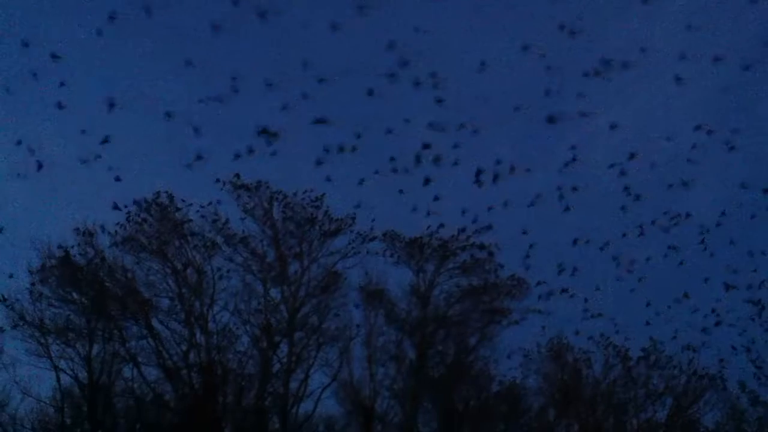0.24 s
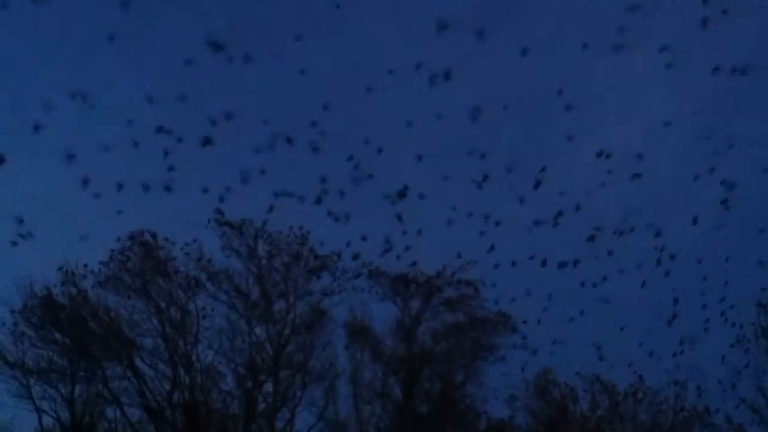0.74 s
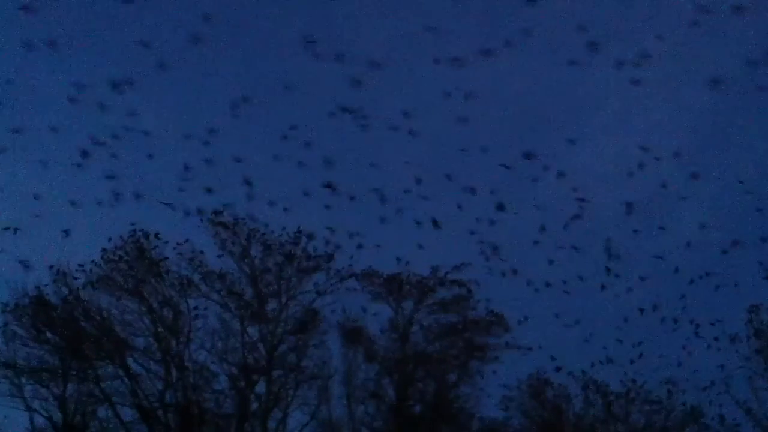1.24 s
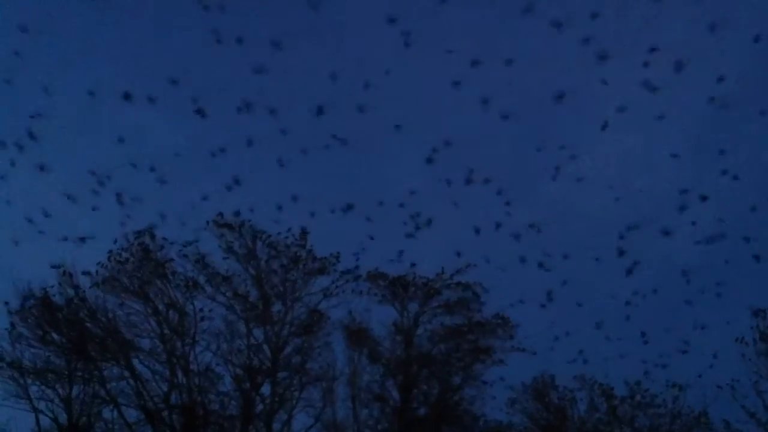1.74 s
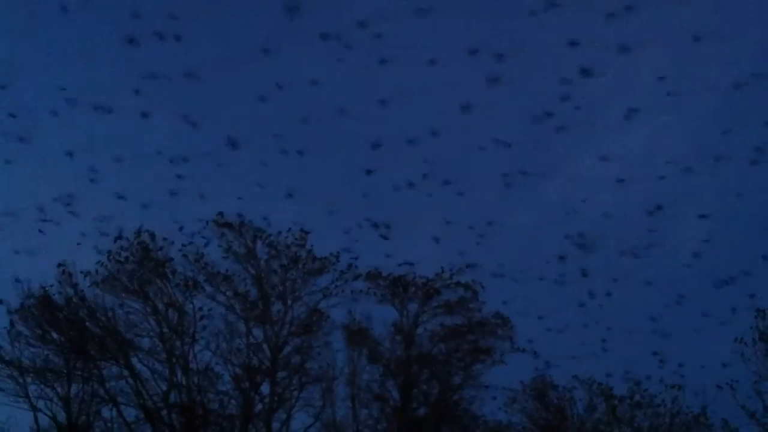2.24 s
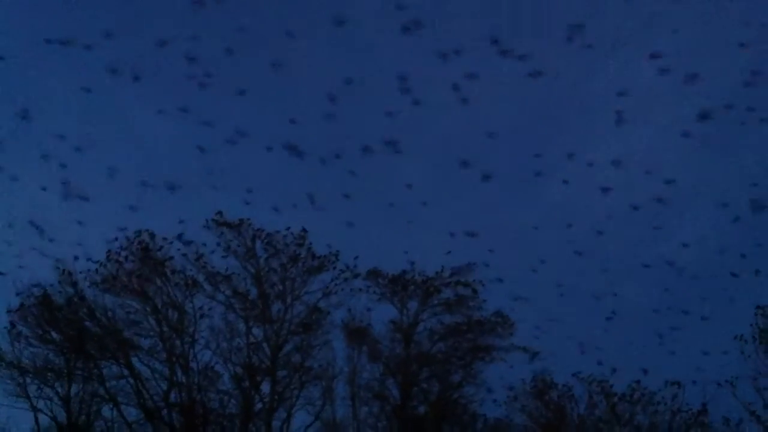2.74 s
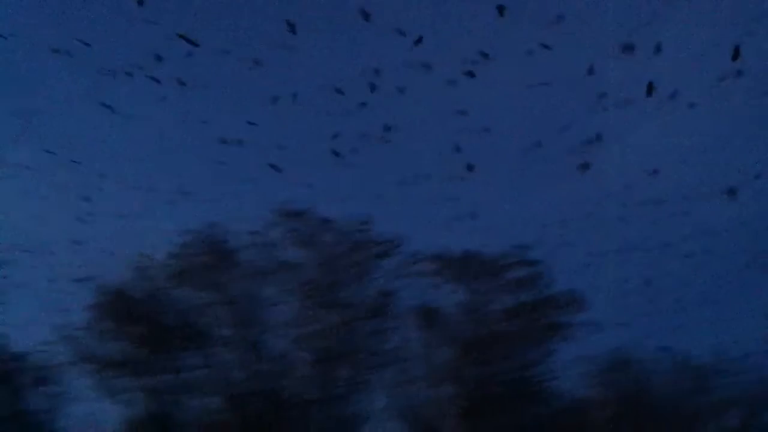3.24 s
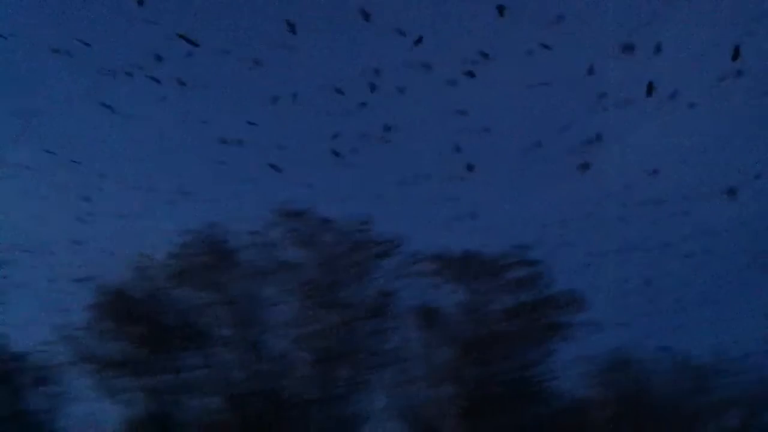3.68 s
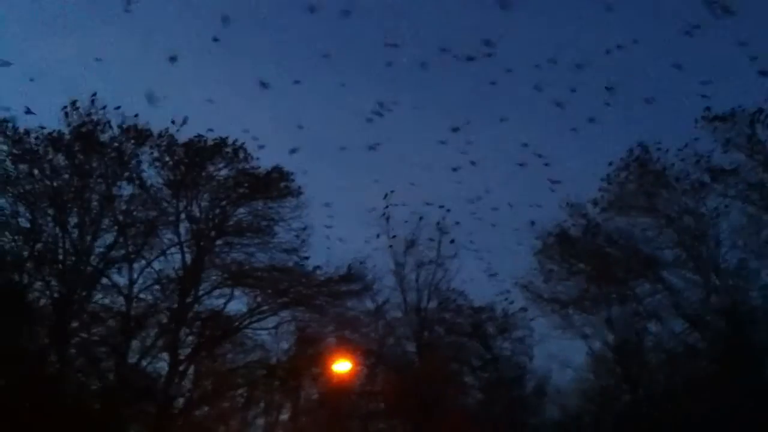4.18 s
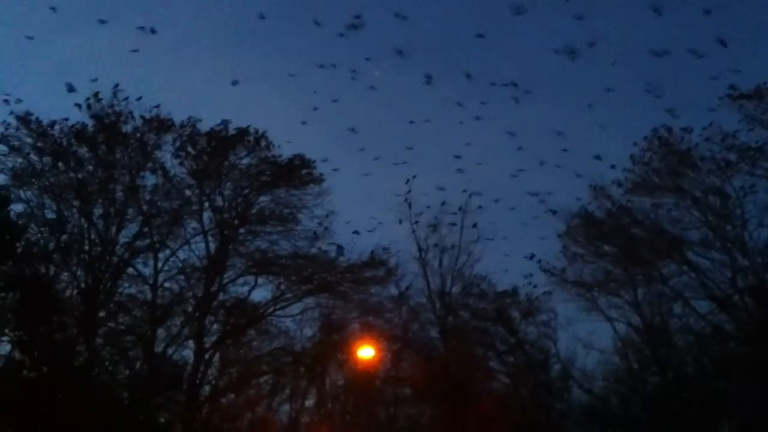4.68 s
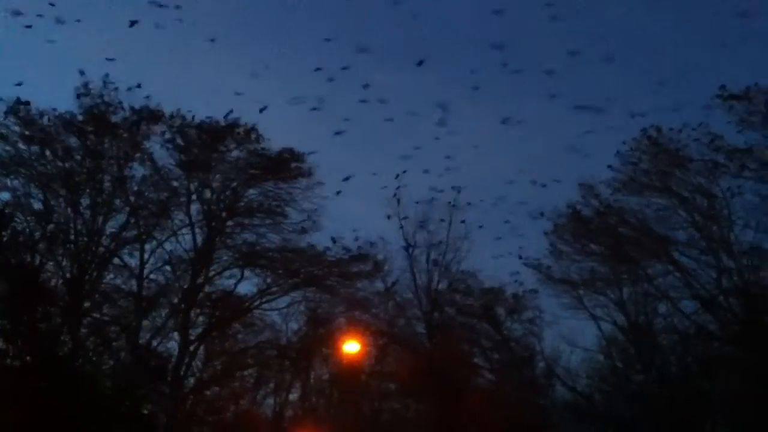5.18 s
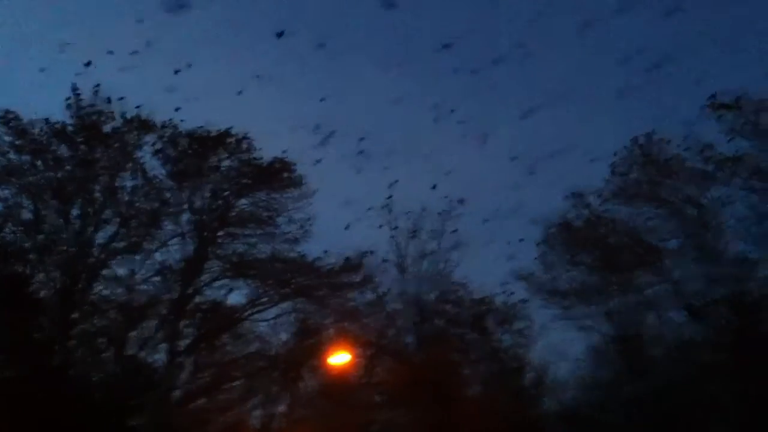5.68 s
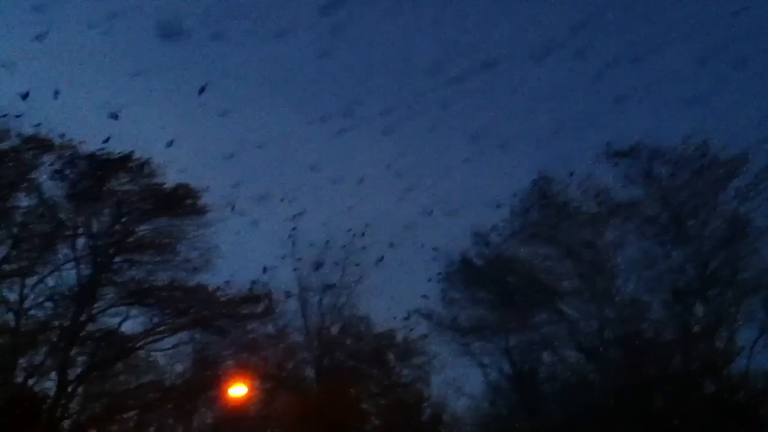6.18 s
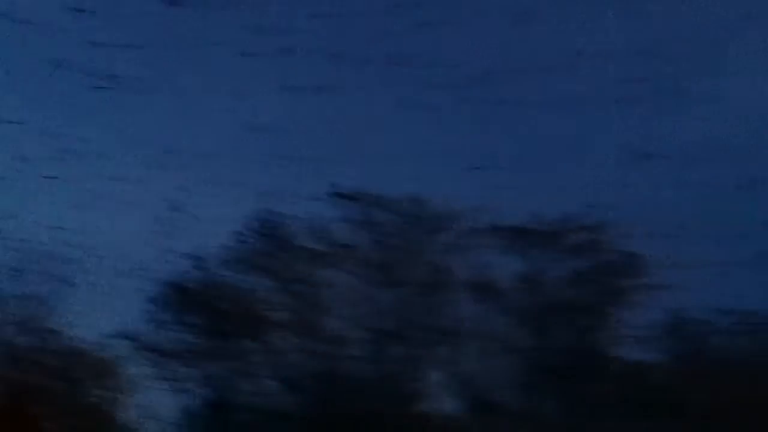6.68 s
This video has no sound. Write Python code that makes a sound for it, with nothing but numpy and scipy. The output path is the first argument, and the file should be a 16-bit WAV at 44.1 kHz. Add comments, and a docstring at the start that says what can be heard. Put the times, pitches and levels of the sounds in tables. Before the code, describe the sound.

Hundreds of crows circle above trees at dusk, their short hoarse caws overlapping into a dense, continuous clamour already under way at the start. A few closer caws and brief raspy yelps stand out, more often around the middle. The din swells and brightens unevenly as birds turn, with calls blurred by the branches. Far traffic murmurs very faintly beneath. Open outdoor microphone, the flock spread overhead, no ending.

```python
"""A roost in trees at dusk: a huge flock of crows wheels over it, hundreds of hoarse caws merging into one din.
The caws are pulses and puffs of air through a throat colour; the din swells and brightens as birds pass closer.
Nearer caws with a moving throat resonance and high raspy yelps stand out of it.
The trees scatter every call into diffuse tails; far from the microphone, filtered noise makes a traffic murmur,
with faint low hums and one soft swell of airy hiss."""
import sys
import numpy as np
from scipy import signal
from scipy.fft import rfft, irfft, next_fast_len
from scipy.io import wavfile
from scipy.ndimage import uniform_filter1d

SR = 44100
rng = np.random.default_rng(int(sys.argv[2]) if len(sys.argv) > 2 else 0)


def master(y):
    """Save y as 16-bit WAV."""
    cut = np.clip(np.atleast_2d(y).T, -1, 1)
    pcm = np.round(cut * 32767)  # scale
    wavfile.write(sys.argv[1], SR, pcm.astype(np.int16))


N = 305767  # length of the scene [samples]

# mean colour of a caw: (frequency [Hz], relative level [dB per Hz])
THROAT_COLOUR = [(60, -63), (380, -30.5), (700, -15), (850, -12.5), (1020, -8.5), (1300, 1.34), (1600, -1),
                 (1900, -5), (2300, -18), (2600, -21), (3100, -18.5), (3450, -20), (3850, -27),
                 (5000, -26.5), (6300, -27.5), (8000, -39), (11000, -53)]


def amp(db):
    """Decibels to gain."""
    return 10 ** (np.asarray(db) / 20)


def evened(x):
    """Scales to rms 1."""
    return x / np.sqrt(np.mean(x ** 2) + 1e-20)


def read(points, hz):
    """Reads a table on a log-frequency axis."""
    f, value = np.transpose(points)
    return np.interp(np.log(hz + 1), np.log(f + 1), value)


def add(mix, s, sound):
    """Adds a sound at time s, cut to the length of the mix."""
    start = int(round(s * SR))
    sound = sound[max(-start, 0):]
    part = mix[max(start, 0):][:len(sound)]
    part += sound[:len(part)]


def coloured(x, db_at):
    """Filters x by a gain in dB given as a function of frequency."""
    size = next_fast_len(len(x))
    gain = amp(db_at(np.fft.rfftfreq(size, 1 / SR)))
    return irfft(rfft(x, size) * gain, size)[:len(x)]


def wavering(count, size, smooth):
    """Noise averaged over `smooth` samples and set to rms 1, of which the first `count` are kept."""
    return evened(uniform_filter1d(rng.standard_normal(size), size=smooth))[:count]


def distant_traffic(level_db=-48.5, top_hz=800):
    """Coloured noise for far traffic and the faint hiss of the air; only the low part slowly swells."""
    # colour of the murmur and air: (frequency [Hz], relative level [dB per Hz])
    floor_colour = [(25, -30), (45, -25), (70, -15), (100, -7.7), (130, -1.5), (210, 1), (250, 0.5),
                    (335, 6.5), (450, 2), (650, 5), (2000, -13), (9000, -32.5), (15500, -33)]
    # swell of the traffic: (time [s], level above the usual [dB])
    traffic_level = [(0, -2), (1.4, -1.1), (2.7, 0.3), (3.8, 0), (4.6, 0.6), (6.0, 0), (6.93, -0.2)]
    murmur = amp(level_db) * evened(coloured(rng.standard_normal(N), lambda f: read(floor_colour, f)))
    low_part = coloured(murmur, lambda f: read([(top_hz / 2, 0), (top_hz * 2, -30)], f))
    swell = amp(np.interp(np.arange(N) / SR, *np.transpose(traffic_level)))
    return murmur + low_part * (swell - 1)


def low_hums():
    """Faint sine tones of wavering pitch that come and go."""
    # (time [s], length [s], level [dB], pitch [Hz], unsteadiness of pitch [share])
    hum_events = [(2.9, 0.62, -61.5, 200.8, 0.05), (4.539, 0.52, -60, 221.6, 0.0036),
                  (6.78, 0.35, -58.5, 207, 0.016)]
    out = np.zeros(N)
    for s, length, db, hz, unsteady in hum_events:
        u = np.linspace(0, 1, int(length * SR))
        waver = wavering(len(u), N, smooth=2000)
        turns = np.cumsum(hz * (1 + unsteady * waver)) / SR
        add(out, s, amp(db) * evened(np.sin(2 * np.pi * turns) * np.sin(np.pi * u)))
    return out


def airy_hiss(peak_s=.93, width_s=.27, level_db=-66.5, air_hz=9000, flicker_db=2.0):
    """High noise that swells once, unevenly, and dies away."""
    hiss = evened(coloured(rng.standard_normal(N), lambda f: read([(air_hz / 2, -20), (air_hz, 0)], f)))
    swell = 1 / (1 + ((np.arange(N) / SR - peak_s) / width_s) ** 2)
    flicker = amp(flicker_db * wavering(N, N, smooth=2500))
    return amp(level_db) * swell * flicker * hiss


def trees(x, wet_db, count=22, hop=.1):
    """Branches scatter each call into a diffuse tail whose treble dies first; the paths change as the birds fly."""
    # ring of the wood: (frequency [Hz], decay time by 60 dB [s])
    wood_ring = [(300, 1.8), (1500, 2.93), (4000, 1.22), (9000, 1.36)]
    hz, t, z = signal.stft(rng.standard_normal((count, SR)), SR, nperseg=256)
    decay = amp(-60 * t / read(wood_ring, hz)[:, None])
    tails = signal.istft(z * decay, SR, nperseg=256)[1]
    place = np.arange(N) / SR / hop  # time counted in hops [of `hop` s]
    echo = np.zeros(N)
    for k, tail in enumerate(tails):
        share = np.maximum(1 - abs((place - k) % count - 1), 0)  # the tails take turns
        echo += signal.fftconvolve(x * np.sqrt(share), tail / np.linalg.norm(tail))[:N]
    return (x + amp(wet_db) * echo) / np.sqrt(1 + amp(wet_db) ** 2)


def yelps(sag=0.038, arch=0.0384, rasp=0.3, rasp_hz=90):
    """Short high sines whose pitch arches and sags; a fast flutter makes them raspy."""
    # (time [s], length [s], level before the trees [dB], pitch [Hz], unsteadiness of pitch [share])
    yelp_events = [(1.19, 0.088, -53, 3150, 0.032), (1.59, .08, -51, 2500, .02),
                   (1.88, .1, -53, 2970, 0.038), (2.22, .08, -51.5, 2600, 0.028),
                   (2.73, 0.1, -54, 2770, 0.033), (2.93, .07, -55, 3660, 0.023),
                   (3.39, .08, -52, 3450, .025), (3.52, .06, -55, 2890, .025),
                   (3.57, 0.13, -51, 3100, 0.039), (3.86, 0.047, -48.5, 3300, .04),
                   (3.92, .08, -51, 2980, 0.022), (4.04, 0.061, -50, 3280, .035),
                   (4.15, .07, -51, 3240, 0.057), (4.32, .06, -53, 3300, .03), (4.5, .07, -51, 2780, .025),
                   (5.19, 0.075, -51.5, 3100, 0.028), (5.25, .08, -51, 2490, 0.043),
                   (5.92, 0.063, -50, 3240, 0.023), (6.09, .08, -53, 2800, .025),
                   (6.22, 0.078, -50, 2800, .02), (6.41, 0.095, -46.5, 2540, .06)]
    out = np.zeros(N)
    for s, length, db, hz, jitter in yelp_events:
        u = np.linspace(0, 1, int(length * SR))
        wobble = wavering(len(u), SR, smooth=60)
        bend = 1 - arch * (2 * u - 1) ** 2 - sag * (u - .5) + jitter * wobble
        turns = np.cumsum(hz * bend) / SR
        flutter = 1 + rasp * np.sin(2 * np.pi * u * length * rasp_hz * rng.uniform(.7, 1.3))
        add(out, s, amp(db) * evened(np.sin(2 * np.pi * turns) * flutter * np.sin(np.pi * u)))
    return out


def sum_of_harmonics(turns, order):
    """Equal cosines up to the given order, in closed form: one sharp pulse a cycle."""
    u = (turns + .5) % 1 - .5
    return (order + .5) * np.sinc((2 * order + 1) * u) / np.sinc(u) - .5


def syrinx(length, hz, rough, arch=0.1293, sag=.09, jitter=0.02604, rasp=0.65, rasp_hz=75):
    """Uneven pulses and puffs of air; the pitch arches and sags, and a fast flutter makes it hoarse."""
    count = int(np.clip(length, .02, .5) * SR)
    wobble, air = rng.standard_normal((2, SR // 2))[:, :count]
    wobble = evened(uniform_filter1d(wobble, size=200))
    u = np.linspace(0, 1, count)
    bend = 1 - arch * (2 * u - 1) ** 2 - sag * (u - .5) + jitter * wobble
    turns = np.cumsum(hz * bend) / SR
    pulses = sum_of_harmonics(turns, order=int(11000 / hz))  # harmonics up to about 11 kHz
    puffs = air * (0.61 + np.exp(-(turns % 1) / 0.37))  # a burst of breath at each pulse
    # the flutter rate follows the bends of the pitch
    flutter = 1 + rasp * np.sin(2 * np.pi * turns * rasp_hz * rng.uniform(0.6977, 1.3) / hz)
    rough = np.clip(rough, 0, 1)
    swell = np.minimum(u / 0.076, 1) * np.minimum((1 - u) / 0.37, 1)
    return ((1 - rough) * evened(pulses) + rough * evened(puffs)) * flutter * swell


def resonate(x, hz, width_hz):
    """A resonance of gain 1 that follows the curve hz."""
    turn = np.exp(2j * np.pi * np.cumsum(hz) / SR)
    r = np.exp(-np.pi * width_hz / SR)
    # shift the resonance to 0 Hz, smooth, and shift back
    return 2 * (turn * signal.lfilter([1 - r], [1, -r], x / turn)).real


def near_crows(rough=0.18, focus_db=7, width_hz=260, beak_arch=0.094):
    """Single close birds; one throat resonance stands out and moves as the beak opens and shuts."""
    # (time [s], length [s], level before the trees [dB], pitch [Hz], strongest throat resonance [Hz],
    #  glide of pitch and resonance over the call [share])
    caw_events = [(0.441, 0.12, -39, 487.5, 1470, 0.014), (.96, .15, -38, 530, 1580, -.1),
                  (1.12, .17, -42, 470, 1400, 0), (1.45, .09, -37, 505, 1510, 0.093),
                  (1.829, 0.094, -38.5, 459, 1390, -0.06), (1.901, 0.14, -39, 415, 1240, -0.014),
                  (2.661, 0.097, -38, 444.6, 1335, -0.093), (2.94, 0.13, -39, 455, 1330, -0.0059),
                  (3.141, .13, -40, 430, 1300, 0.0068), (3.27, 0.101, -37.5, 567.6, 1700, -0.064),
                  (3.88, .11, -34.5, 519.4, 1550, 0.053), (3.958, 0.12, -35, 594, 1790, 0.11),
                  (4.16, .14, -38.5, 497.4, 2000, -0.045), (4.221, 0.095, -37, 479, 1410, 0),
                  (4.511, .14, -35, 442.7, 1340, -0.144), (5.139, 0.12, -37, 619, 1850, .05),
                  (5.181, 0.083, -37, 418, 1250, 0.0086), (5.252, 0.14, -39, 583, 1740, 0.026),
                  (5.979, 0.12, -40, 544, 1640, -0.0063), (6.478, .1, -39, 450, 1370, 0.0026),
                  (6.58, .12, -40, 466.6, 1400, 0.054), (6.829, .12, -39, 442, 1350, 0.0058)]
    out = np.zeros(N)
    for s, length, db, hz, throat_hz, glide in caw_events:
        source = syrinx(length, hz, rough, sag=-glide)
        voice = coloured(source, lambda f: read(THROAT_COLOUR, f))
        u = np.linspace(-.5, .5, len(voice))
        path = throat_hz * (1 + glide * u - beak_arch * (2 * u) ** 2)
        focus = amp(focus_db) * resonate(voice, path, width_hz)
        add(out, s, amp(db) * evened(voice + focus))
    return out


def flock_voices(size, pitch_hz=480, pitch_spread=.15, rough=0.34,
                 edge_db=10, edge_hz=3150, edge_spread_hz=520, edge_width_hz=130):
    """Birds that each have their own pitch, length, hoarseness and upper throat resonance."""
    rank = (np.arange(size) + 2) / (size + 3)
    pitches = pitch_hz * (rank / (1 - rank)) ** pitch_spread  # most near the middle, a few deep or shrill
    voices = []
    for hz, (length, hoarse, bend, edge, strain) in zip(pitches, rng.uniform(-1, 1, (size, 5))):
        source = syrinx(.18 + .07 * length, hz, rough + 0.15 * hoarse, arch=.17 + .08 * bend)
        edge_at = edge_hz + edge_spread_hz * edge

        def colour(f):
            ring = edge_db * strain ** 6  # only a few straining birds ring strongly here
            return read(THROAT_COLOUR, f) + ring / (1 + ((f - edge_at) / edge_width_hz) ** 2)

        voices.append(evened(coloured(source, colour)))
    return voices


def flock(count=2600, size=470, spread_db=2.0, doppler=.04, glide=.07):
    """Many birds call at random times, distances and flight speeds, which set level and pitch."""
    voices = flock_voices(size)
    out, turn = np.zeros(N), rng.permutation(size)
    for k, (when, distance, heading, slide) in enumerate(rng.random((count, 4))):
        voice = voices[turn[k % size]]
        speed = 1 + doppler * np.cos(np.pi * heading)  # flying nearer raises the pitch
        ramp = np.linspace(-1, 1, int(len(voice) / speed))
        beak = 1 + glide * (2 * slide - 1) * ramp  # the whole voice slides up or down
        call = np.interp(np.cumsum(speed * beak), np.arange(len(voice)), voice)
        s = (k + when) / count * (N / SR + .5) - .5  # some calls are under way at the start
        add(out, s, amp(-spread_db * np.log(distance + 0.05)) * call)
    return evened(out)


def wheeling(din, din_db=-29, lower_hz=1350, upper_hz=1750, dull_hz=2000, bright_hz=4000, treble_depth=1.28):
    """The din builds as birds join in and swells as the flock turns, most of all in the treble."""
    # caw band: (time [s], level of its lower half [dB], level of its upper half [dB]), above the usual
    chorus_level = [(0, -1.8, -1.5), (.35, -1.8, -1.5), (.62, -2, -2.5), (1.1, -0.9, -1.9),
                    (1.42, -2.3, -1.6), (1.9, -1, -2), (2.2, -1.6, -1.7), (2.8, 0.2, 0.5), (3.06, -1, -.5),
                    (3.33, 1, 1), (3.49, -.7, -.7), (3.82, -0.7, -0.5), (4.1, -0.7, 1.7), (4.42, -1.5, .4),
                    (4.65, 1, 1.7), (4.95, -1.4, -0.9), (5.1, -0.5, -.7), (5.2, 0.8, 2.2), (5.37, 0.3, 1),
                    (5.85, -.9, 0), (6.05, 0, 0.2), (6.35, -0.7, -0.7), (6.65, 0, -0.5), (6.93, -.9, -1.6)]
    # treble as the flock wheels: (time [s], level above the usual before treble_depth scales it [dB])
    treble_level = [(0.0, -1.5), (.35, -1.3), (.5, -2.5), (.68, -1.5), (0.96, 0), (1.22, 1), (1.44, -2),
                    (1.7, 0.5), (1.76, -1), (1.82, 0), (1.93, 0), (2.1, -2.5), (2.3, -1.2), (2.55, 1),
                    (2.75, 0.5), (2.87, 0.6), (3.08, -1.5), (3.38, 1.5), (3.62, 1.5), (3.75, -0.5),
                    (3.94, -1), (3.99, 1), (4.2, 2.5), (4.36, 1), (4.5, 2), (4.8, -0.5), (5.05, -0.9),
                    (5.34, 1.5), (5.5, 0.9), (5.61, 2), (5.67, -0.5), (5.84, -0.5), (6.08, 1.1),
                    (6.28, 0.5), (6.5, -.5), (6.93, -0.2)]
    hz, t, z = signal.stft(din, SR, nperseg=512)
    times, lower_db, upper_db = np.transpose(chorus_level)
    upper = read([(lower_hz, 0), (upper_hz, 1)], hz)[:, None]
    caw_db = (1 - upper) * np.interp(t, times, lower_db) + upper * np.interp(t, times, upper_db)
    treble = read([(dull_hz, 0), (bright_hz, 1)], hz)[:, None]
    treble_db = treble_depth * np.interp(t, *np.transpose(treble_level))
    db = din_db + (1 - treble) * caw_db + treble * treble_db
    return signal.istft(z * amp(db), SR, nperseg=512)[1][:N]


def scene():
    """The background, the nearer birds and the din of the whole flock."""
    background = distant_traffic() + low_hums() + airy_hiss()
    close = trees(near_crows() + yelps(), wet_db=-10.0)
    din = wheeling(evened(trees(flock(), wet_db=-6.5)))
    return (din + close + background)[None]


def record(dry, edge_hz=15850):
    """The band limit of the recorder behind the microphone: a steep low-pass."""
    low_pass = signal.firwin(511, edge_hz, window=("kaiser", 9), fs=SR)
    return signal.oaconvolve(dry, low_pass[None], "same")


dry = scene()
out = record(dry)
master(out)
```